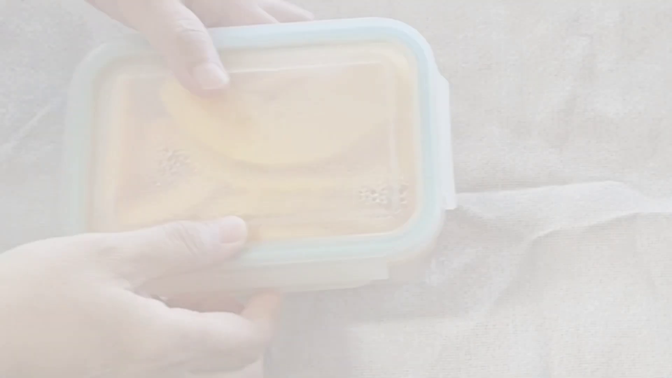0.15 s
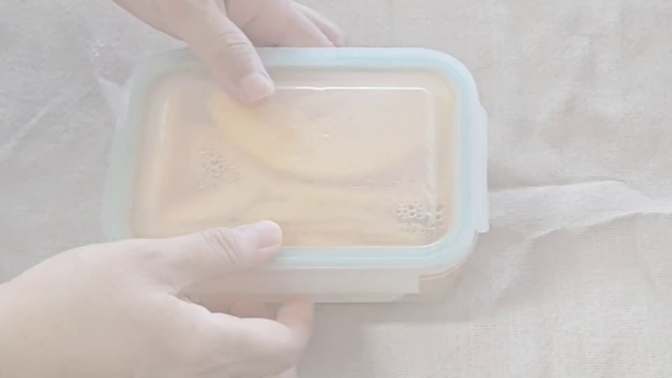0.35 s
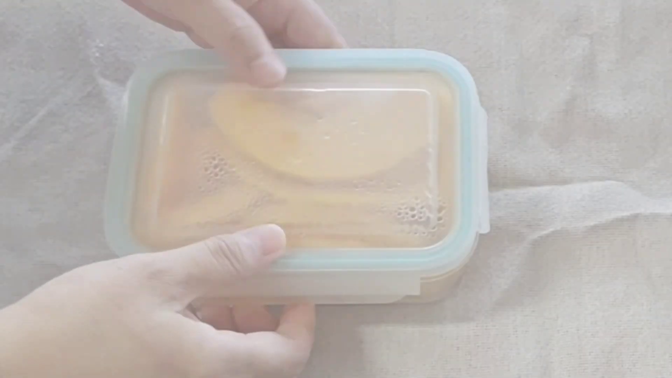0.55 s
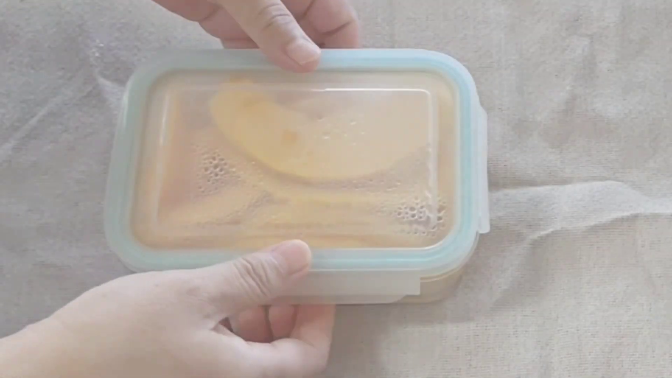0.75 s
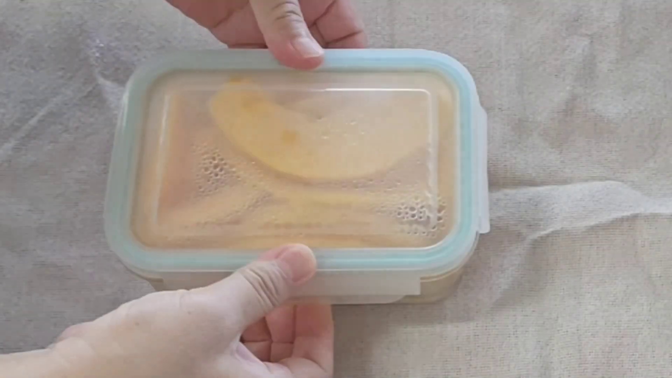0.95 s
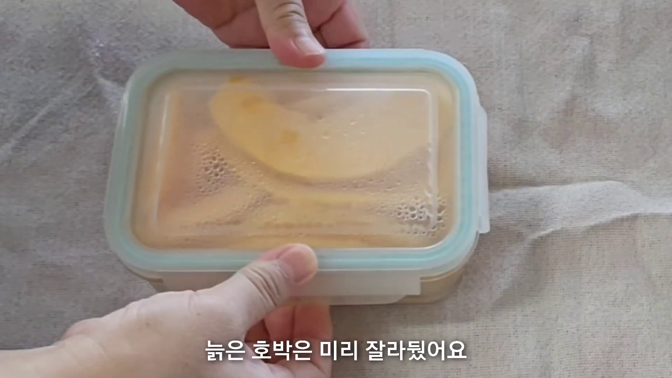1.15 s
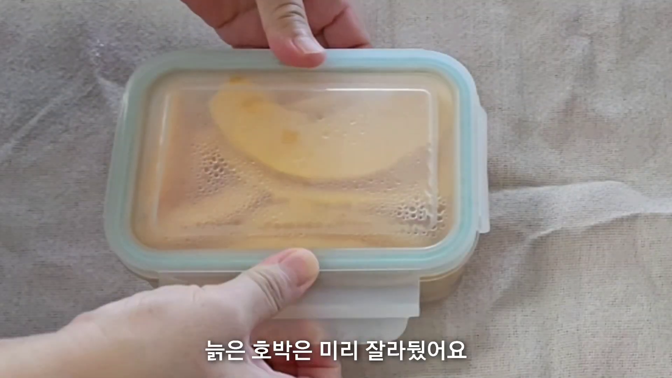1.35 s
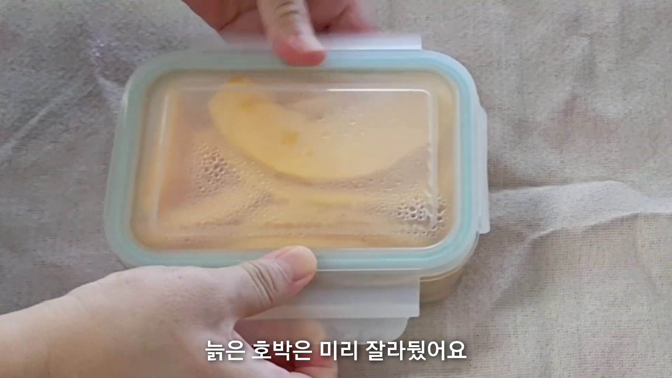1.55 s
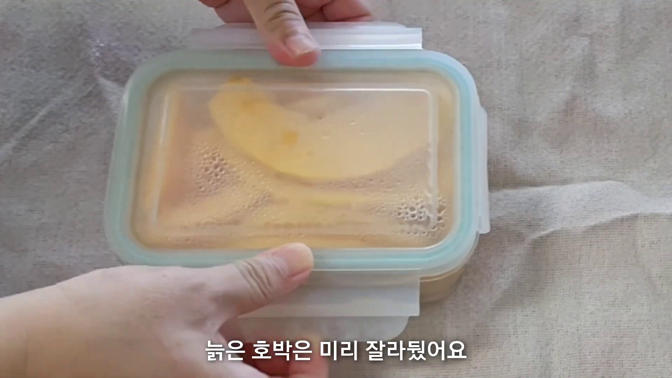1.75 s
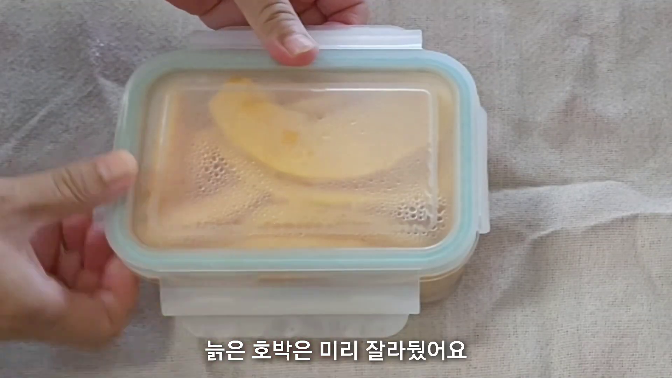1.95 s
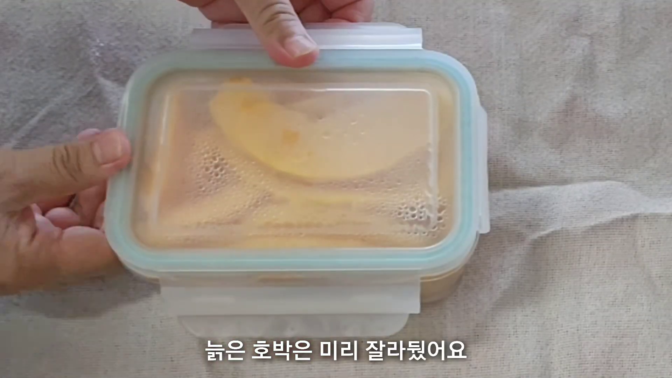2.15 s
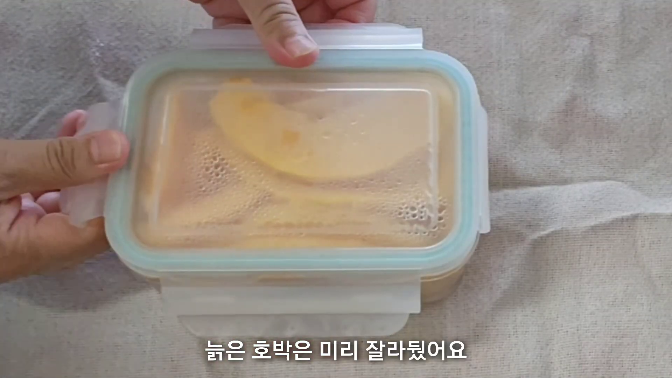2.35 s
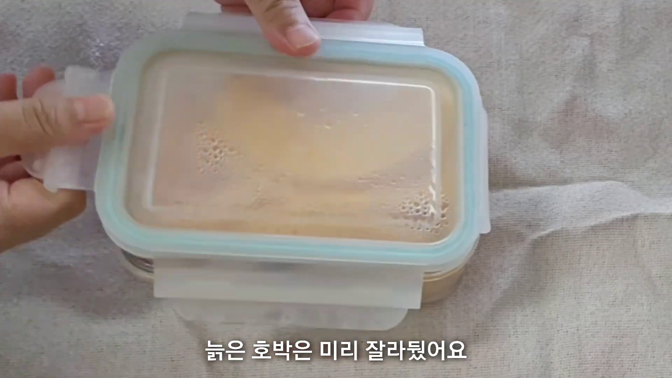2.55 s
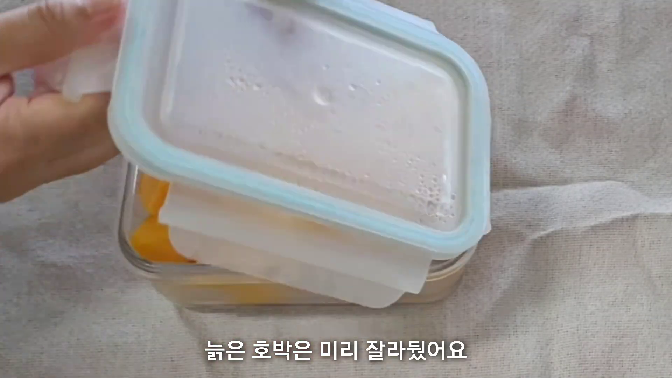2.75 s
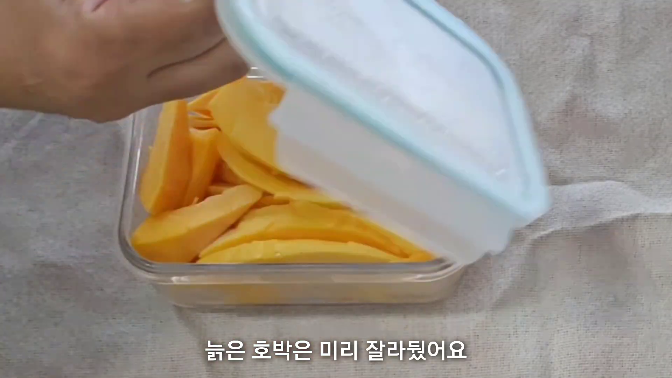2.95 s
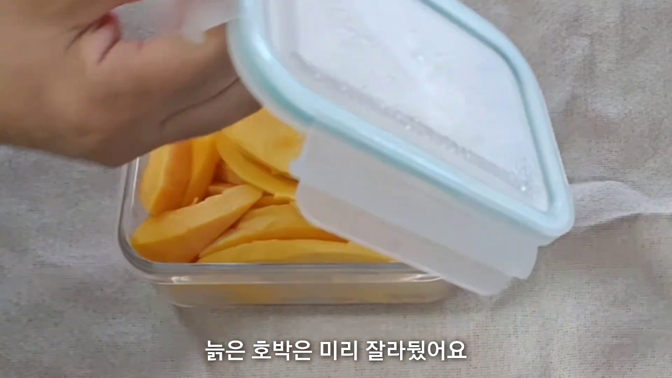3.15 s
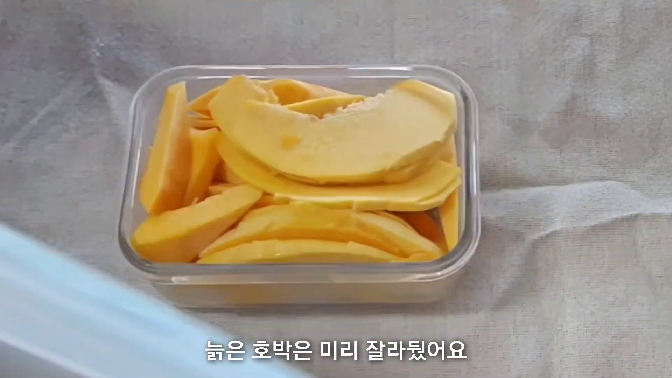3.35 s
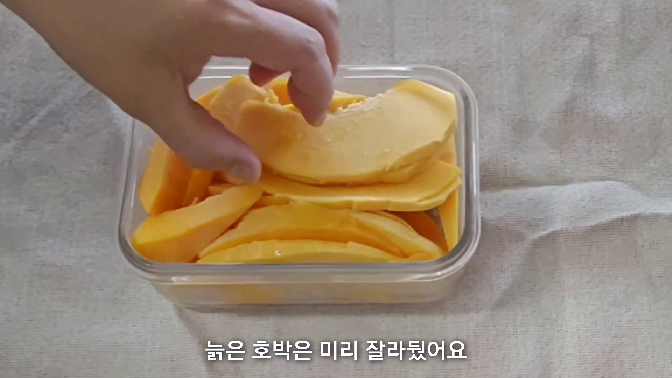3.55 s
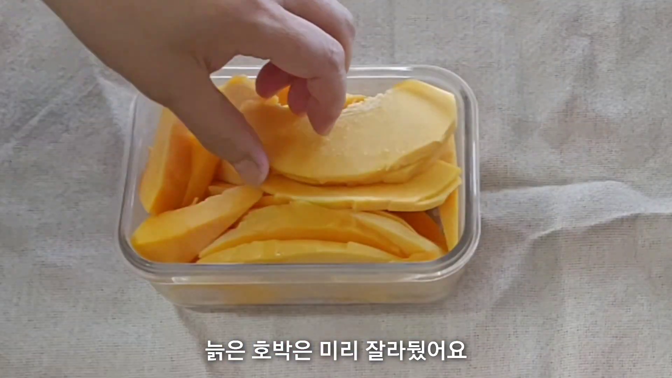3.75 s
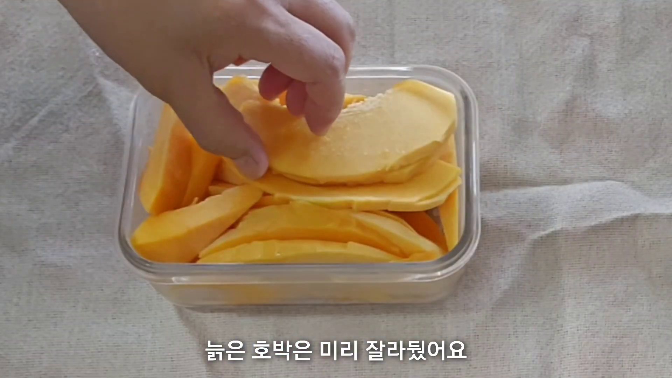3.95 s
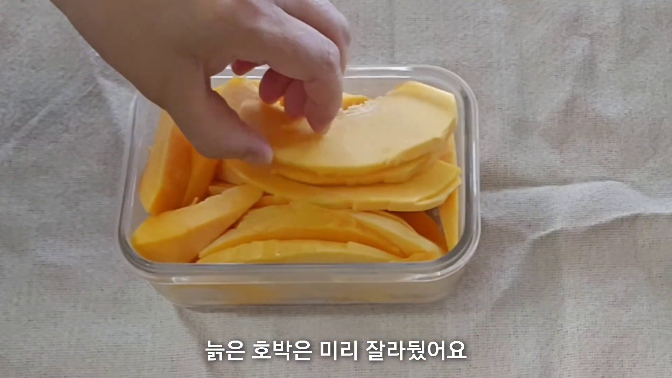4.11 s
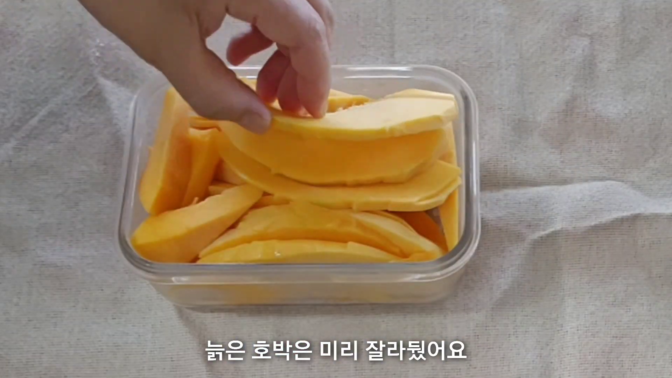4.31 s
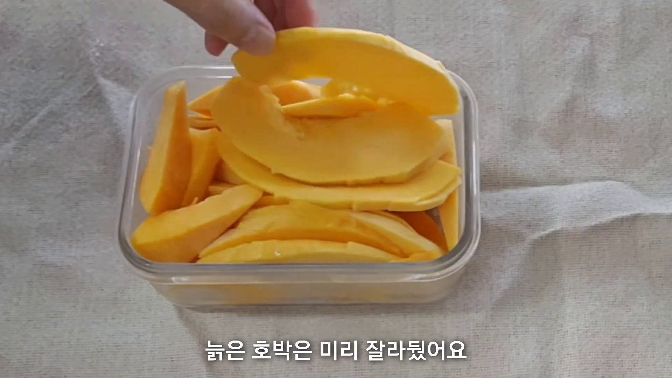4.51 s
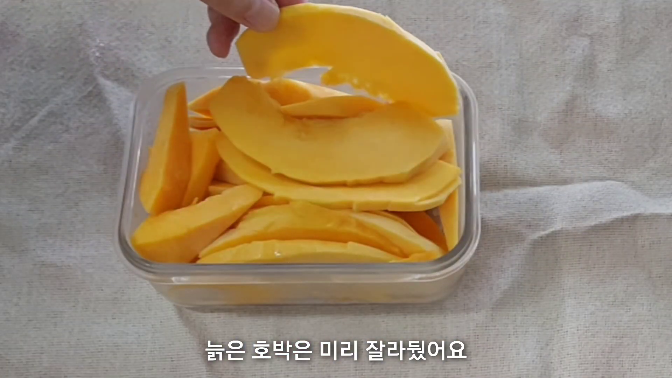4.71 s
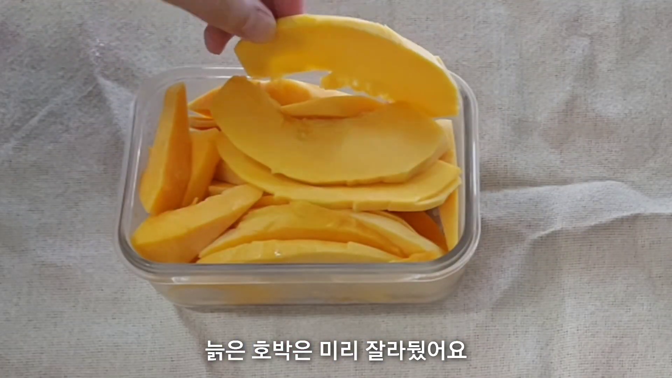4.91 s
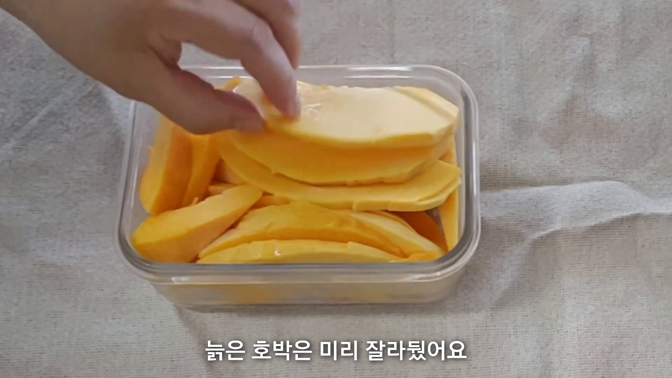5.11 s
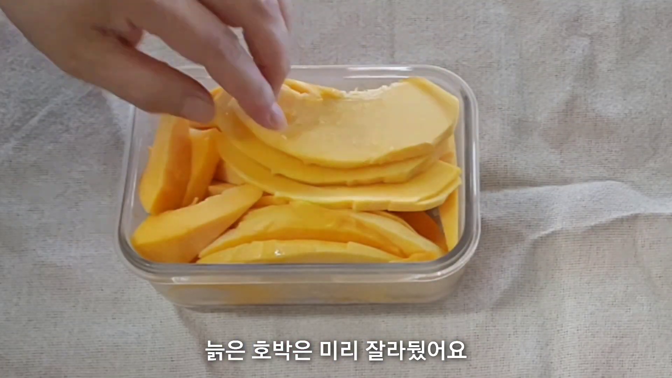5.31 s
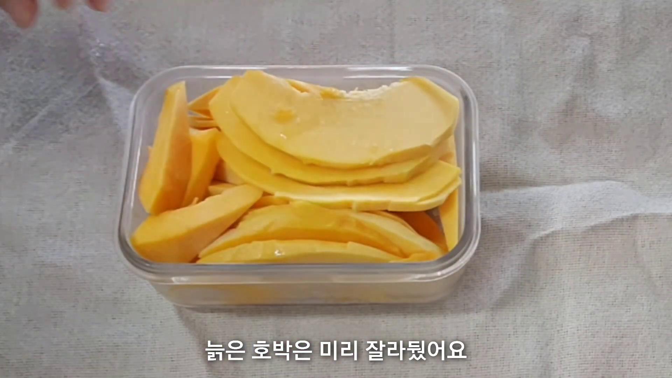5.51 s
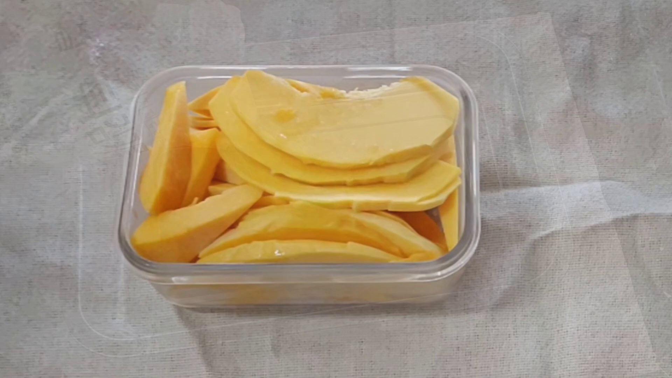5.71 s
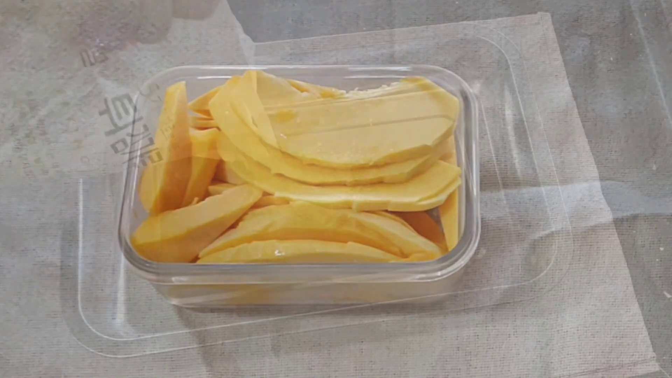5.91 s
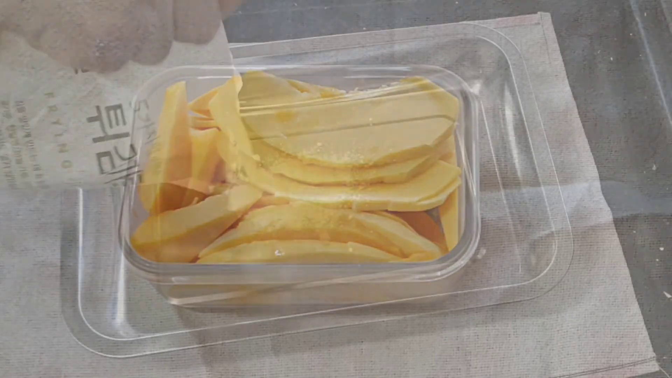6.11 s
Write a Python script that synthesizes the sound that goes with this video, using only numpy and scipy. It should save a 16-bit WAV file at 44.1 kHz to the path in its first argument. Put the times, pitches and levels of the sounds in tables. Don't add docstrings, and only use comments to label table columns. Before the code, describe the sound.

Over a faint low kitchen hum, skin scuffs lightly, then a heavy glass box thumps dully onto cloth. Three plastic latches snap open, the first by far the loudest. The lid knocks the rim and clacks down brighter to the side. After quiet moist finger touches on pumpkin slices, a plastic bag crackles. Close stereo microphone, lively room with short dense echoes.

```python
import sys
import numpy as np
from scipy import signal
from scipy.fft import rfft, irfft
from scipy.io import wavfile

SR = 44100
rng = np.random.default_rng(int(sys.argv[2]) if len(sys.argv) > 2 else 0)


def wav_record(signal):
    frames = np.transpose(np.atleast_2d(signal))
    bounded = np.clip(frames, -1, 1)
    quanta = np.round(bounded * 32767).astype(np.int16)
    wavfile.write(sys.argv[1], SR, quanta)


def rack_gain(trim_db):
    fader = np.asarray(trim_db, float)
    return 10 ** (fader / 20)


N = 272097
BANDS = 14 * 2 ** np.arange(0, 10.5, .4)
BAG_SHOT_S = 5.688


def rms_one(x):
    return x / np.sqrt(np.mean(x ** 2) + 1e-20)


def at_hz(points, hz):
    points_hz, values = np.array(points).T
    return np.interp(np.log(hz), np.log(points_hz), values)


def drift(rate, size=N):
    knots = rng.standard_normal(400)
    return np.interp(np.arange(size) / SR * rate, np.arange(400), knots)


def resonate(x, peaks, blur):
    rings = []
    for k, (hz, width, level_db) in enumerate(peaks):
        radius = np.exp(-np.pi * max(width, 10) * blur / SR)
        zeros = [(1 - radius ** 2) / 2, 0, (radius ** 2 - 1) / 2]
        poles = [1, -2 * radius * np.cos(2 * np.pi * hz / SR), radius ** 2]
        rings.append((-1) ** k * rack_gain(level_db) * signal.lfilter(zeros, poles, x))
    return np.array(rings)


def contacts(rows, peaks, rattle_s, room_db, rattle_db, creep_db, pan_db, apart):
    out = np.zeros((3, N + SR))
    lead = SR // 40
    t = (np.arange(SR // 4) - lead) / SR
    pan = rack_gain(np.array([[pan_db / 2], [-pan_db / 2]]))
    treble = signal.butter(1, 1500, "high", fs=SR, output="sos")
    for start_s, peak_db, top_hz, bottom_hz in rows:
        force_db = np.where(t < 0, creep_db + 60 * t / 0.038, rattle_db - 60 * t / rattle_s)
        slips = rng.standard_normal((3, len(t))) * rng.exponential(1, len(t))
        push = slips * rack_gain(force_db) * [[1], [1], [0]]
        push[:, lead] -= 1
        push = signal.sosfilt(signal.butter(2, min(top_hz, 18000), fs=SR, output="sos"), push)
        push = signal.sosfilt(signal.butter(2, bottom_hz, "high", fs=SR, output="sos"), push)

        mid, other = resonate(push[:2], peaks, blur=0.94).sum(axis=0)
        side = apart * signal.sosfilt(treble, np.roll(other, 3))

        room_rings = resonate(push[2], peaks, blur=2.0)
        power = np.sum(np.abs(rfft(room_rings)) ** 2, axis=0)
        spread = np.roll(irfft(np.sqrt(power), len(t)), lead + SR // 300)
        spread = spread * np.sqrt(np.sum(mid ** 2) / np.sum(spread ** 2)) * rack_gain(room_db)

        gain = rack_gain(peak_db) / np.abs(mid).max()
        first = round(start_s * SR) - lead
        out[:2, first:first + len(t)] += gain * (mid + side * [[1], [-1]]) * pan
        out[2, first:first + len(t)] += gain * spread
    return out[:, :N]


def diffuse(size, gain, edges=BANDS):
    # frequency in Hz, likeness from 0 to 1.
    likeness = [(60, 0.98), (130, 0.83), (290, 1), (640, .45), (1400, 0.), (16000, 0.055)]
    out = 0
    white = rng.standard_normal((2, 2, size))
    for k, (low, high) in enumerate(zip(edges, edges[1:])):
        band = signal.butter(2, [low, high], "band", fs=SR, output="sos")
        mid, side = signal.sosfilt(band, white[k % 2])
        hz = np.sqrt(low * high)
        alike = np.clip(at_hz(likeness, hz), -1, 1)
        out = out + gain(hz) * (np.sqrt(1 + alike) * mid + np.sqrt(1 - alike) * side * [[1], [-1]])
    return out


def latches():
    # start in seconds, peak level in dB, top in Hz, bottom in Hz.
    front_hits = [
        (1.5207, -2, 6000, 58.47),
        (1.5275, -21, 3000, 608),
    ]
    # start in seconds, peak level in dB, top in Hz, bottom in Hz.
    back_hits = [
        (1.7578, -13.5, 12200, 300),
        (1.760, -26.5, 5000, 100),
        (1.7645, -32.5, 7000, 40),
        (1.767, -25.5, 300, 30),
        (1.786, -42.5, 200, 30),
        (1.9675, -47.5, 9000, 500),
        (2.14, -65, 8120, 2000),
    ]
    # start in seconds, peak level in dB, top in Hz, bottom in Hz.
    side_hits = [
        (2.416, -33, 507, 60),
        (2.422, -17.5, 10190, 61),
        (2.4322, -24.5, 400, 60),
        (2.442, -35.5, 300, 60),
    ]
    # frequency in Hz, width in Hz, level in dB.
    front_ring = [(106, 73, -8.5), (330, 170, -9), (900, 100, -16.5), (1086, 150, -4.5), (1414, 200, 1.5),
                  (1899, 220, -3), (2200, 190, -4), (2680, 330, -14.5), (3120, 140, -9), (4123, 400, -18),
                  (5200, 550, -24), (6260, 600, -22), (7720, 800, -21.5), (12700, 1300, -23)]
    # frequency in Hz, width in Hz, level in dB.
    back_ring = [(54, 56, 1.5), (200, 130, 2), (350, 90, -0.5), (520, 35, -2), (770, 130, -9.5),
                 (1000, 130, 0), (1476, 160, 0.5), (1990, 260, -8), (3030, 130, -5), (4748, 500, -10),
                 (5370, 300, -9), (7000, 1100, -22.5), (11600, 1800, -26.5), (14510, 1100, -30)]
    # frequency in Hz, width in Hz, level in dB.
    side_ring = [(103, 42.9, 8.5), (244, 46, -4), (328, 28, 3.5), (538, 58, 2), (760, 97, -13.5),
                 (1017, 136, -0.5), (1330, 180, -2), (2060, 262, -12.5), (3115, 150, -12.5),
                 (3500, 300, -14.5), (5390, 835, -25.5), (7400, 600, -27), (10660, 1200, -23.5),
                 (14210, 1700, -27)]
    front = contacts(front_hits, front_ring, rattle_s=0.055, room_db=-14, rattle_db=-31, creep_db=-48.5,
                     pan_db=1.5, apart=0.54)
    back = contacts(back_hits, back_ring, rattle_s=0.037, room_db=-9, rattle_db=-21, creep_db=-41.5,
                    pan_db=2.5, apart=0.36)
    side = contacts(side_hits, side_ring, rattle_s=0.034, room_db=-12.5, rattle_db=-22.5, creep_db=-45.5,
                    pan_db=1.5, apart=0.82)
    return front + back + side


def glass_box():
    # start in seconds, peak level in dB, top in Hz, bottom in Hz.
    landing_hits = [
        (.4975, -28.5, 220, 60.2),
        (.5325, -39, 900, 200),
        (.5345, -15, 3500, 150),
        (.5395, -24.5, 900, 61),
        (.546, -23.5, 700, 59.84),
    ]
    # start in seconds, peak level in dB, top in Hz, bottom in Hz.
    slide_slips = [
        (.546, -59, 7000, 2500),
        (.565, -58, 7000, 2500),
        (.62, -59, 7000, 2500),
        (1.775, -37.5, 7000, 2500),
        (1.85, -57, 7000, 2440),
    ]
    # start in seconds, peak level in dB, top in Hz, bottom in Hz.
    counter_thuds = [
        (.536, -36.5, 90, 20),
        (1.523, -36, 122.4, 19),
        (1.762, -32, 120.4, 20.5),
        (2.425, -33, 120, 20),
        (5.375, -49, 150, 54),
    ]
    # frequency in Hz, width in Hz, level in dB.
    glass_ring = [(100.5, 11, 10), (268, 60, 7), (347, 47, 2.5), (550, 96, 6), (774, 56, 6.5),
                  (1060, 84, 3.5), (1358, 71, 1), (2200, 400, -40), (4000, 1100, -41), (12000, 4500, -29)]
    # frequency in Hz, width in Hz, level in dB.
    squeak_ring = [(3120, 61, 6), (3434, 40, 5.5), (3990, 310, -2.5), (4640, 80, -5.5), (5040, 83, -2.5),
                   (5380, 82, 6), (6170, 50, -1.5)]
    # frequency in Hz, width in Hz, level in dB.
    counter_ring = [(35.3, 16, -2.5), (62.72, 30, 0.5), (100, 40, 1.5)]
    landing = contacts(landing_hits, glass_ring, rattle_s=0.056, room_db=-10, rattle_db=-31.5, creep_db=-45.5,
                       pan_db=1.5, apart=0.4)
    squeak = contacts(slide_slips, squeak_ring, rattle_s=.4, room_db=-4.5, rattle_db=-4.5, creep_db=-0.5,
                      pan_db=3.5, apart=.9)
    boom = contacts(counter_thuds, counter_ring, rattle_s=.03, room_db=-14.5, rattle_db=-33.5, creep_db=-48.5,
                    pan_db=1.66, apart=.1)
    return landing + squeak + boom


def lid():
    # start in seconds, peak level in dB, top in Hz, bottom in Hz.
    lift_hits = [
        (2.610, -49, 1500, 705),
        (2.6203, -32.5, 7500, 784),
        (2.632, -36, 7940, 200),
        (2.6765, -47, 3000, 200),
        (2.684, -47.5, 503, 150),
        (2.691, -46.5, 8650, 805),
        (2.703, -53, 1000, 200),
        (2.845, -40, 604, 426),
        (2.8455, -46, 2530, 1190),
    ]
    # start in seconds, peak level in dB, top in Hz, bottom in Hz.
    lay_hits = [
        (3.1215, -42, 1500, 706),
        (3.128, -32, 5000, 1000),
        (3.1325, -24.5, 13960, 400),
        (3.14, -35, 5000, 1200),
        (3.151, -44, 6000, 1500),
        (3.352, -58, 11900, 1500),
    ]
    # frequency in Hz, width in Hz, level in dB.
    loose_ring = [(337, 48, 8), (507, 55, 9), (1000, 180, -4.5), (1500, 260, -11), (2082, 80, -7),
                  (3304, 550, -14.5), (5000, 840, -20), (7260, 670, -27.5), (11840, 1800, -30)]
    # frequency in Hz, width in Hz, level in dB.
    laid_ring = [(512.5, 220, -17.5), (1136, 200, -4), (1542, 99, 1.5), (2330, 370, -4.5), (3000, 124, 0.5),
                 (3380, 210, -4), (4390, 278, -0.5), (5650, 180, -4.5), (6440, 320, -11.5),
                 (7370, 250, -6.5), (10740, 1500, -13.5), (13510, 2500, -18)]
    lifted = contacts(lift_hits, loose_ring, rattle_s=0.086, room_db=-11, rattle_db=-27, creep_db=-41,
                      pan_db=2.0, apart=0.63)
    laid = contacts(lay_hits, laid_ring, rattle_s=0.035, room_db=-8.5, rattle_db=-9.5, creep_db=-30.0,
                    pan_db=4.0, apart=0.62)
    return lifted + laid


def bag_crackle():
    # start in seconds, peak level in dB, top in Hz, bottom in Hz.
    film_pops = [(5.706, -47, 2520, 400), (5.724, -37, 1500, 606), (5.732, -28.5, 2560, 300),
                 (5.740, -29, 2540, 504), (5.799, -38, 800, 400), (5.819, -40, 1500, 496),
                 (5.867, -33.5, 2200, 580), (5.881, -40, 3500, 606), (5.904, -35.5, 2300, 590),
                 (5.912, -35, 2000, 500), (5.9595, -38.5, 1790, 590), (6.018, -41, 3500, 800),
                 (6.051, -50, 2470, 500), (6.0825, -32, 1900, 930), (6.098, -31.5, 2000, 860),
                 (6.107, -36, 1500, 500), (6.166, -25.5, 2430, 490)]
    # start in seconds, peak level in dB, top in Hz, bottom in Hz.
    crease_ticks = [
        (5.7755, -33, 7000, 800),
        (5.976, -35, 4000, 800),
        (5.983, -30, 11600, 1880),
        (6.0945, -36, 8440, 900),
        (6.1615, -26.5, 3000, 580),
    ]
    # frequency in Hz, width in Hz, level in dB.
    film_ring = [(102.5, 34, 0.5), (300, 710, -6), (884, 680, -3), (1170, 186, -1), (1500, 150, -5),
                 (2000, 250, -8), (3430, 760, -15.5), (5300, 790, -21), (7570, 1200, -25),
                 (11900, 500, -13)]
    # frequency in Hz, width in Hz, level in dB.
    crease_ring = [(1060, 570, 11), (2000, 370, -1.5), (3000, 490, -7.5), (5260, 670, 1), (5550, 400, 1.5),
                   (7700, 1200, -13), (11600, 980, -13)]
    pops = contacts(film_pops, film_ring, rattle_s=0.028, room_db=-12.5, rattle_db=-24, creep_db=-32,
                    pan_db=-0.5, apart=0.62)
    ticks = contacts(crease_ticks, crease_ring, rattle_s=0.018, room_db=-12.5, rattle_db=-11.5, creep_db=-24.5,
                     pan_db=2.0, apart=0.7)
    return pops + ticks


def bag_rustle():
    # frequency in Hz, density in dB per Hz.
    rustle_colour = [(60, 0), (120, -6), (250, 0.5), (500, -7), (1100, -7.5), (2000, -18), (4000, -21.5),
                     (7000, -29.5), (9500, -33), (11500, -29.5), (16000, -36.5)]
    level_db, swell_db_per_s = -54.5, 4.5
    start = round(BAG_SHOT_S * SR)
    size = N - start
    clumps = drift(40, size)

    def patchy(hz):
        return rack_gain(at_hz(rustle_colour, hz) + 2.0 * clumps + 2.2 * drift(27, size))

    swell = rack_gain(level_db + swell_db_per_s * np.arange(size) / SR)
    film = swell * rms_one(diffuse(size, patchy))
    return np.pad(film, ((0, 0), (start, 0)))


def fingers():
    # start in seconds, peak level in dB, top in Hz, bottom in Hz.
    touches = [
        (.73, -60, 9350, 3000),
        (.8546, -44.5, 11600, 1500),
        (.9124, -56.5, 6000, 300),
        (1.043, -61, 8800, 2000),
        (4.307, -44.5, 12900, 790),
        (5.3755, -52.5, 1500, 890),
    ]
    # start in seconds, peak level in dB, top in Hz, bottom in Hz.
    scuffs = [
        (.145, -62, 8200, 2600),
        (.251, -59.5, 8000, 1908),
        (.33, -64, 5970, 2537),
        (3.922, -58, 5000, 1934),
        (3.99, -68, 5000, 2514),
    ]
    # frequency in Hz, width in Hz, level in dB.
    skin_ring = [(150, 53, -7.5), (400, 140, -2.5), (1300, 890, -4.5), (2120, 200, 0), (4153, 980, -3.5),
                 (7500, 860, -12), (11780, 680, -3.5)]
    taps = contacts(touches, skin_ring, rattle_s=.035, room_db=-7.5, rattle_db=-7.0, creep_db=-18,
                    pan_db=4.5, apart=0.5)
    drags = contacts(scuffs, skin_ring, rattle_s=0.35, room_db=1, rattle_db=-12.0, creep_db=-20,
                     pan_db=4.0, apart=0.76)
    return taps + drags


def kitchen_echoes(send):
    # frequency in Hz, time to fall 60 dB in seconds.
    kitchen_t60 = [(60, 1), (250, 1), (1000, 0.74), (3000, 0.74), (6000, 0.82), (9000, 0.2), (15000, .25)]
    early_t60_s, early_db, first_echo_s = 0.13, 10, 0.0012
    bright_db_per_octave, bright_from_hz = 1.5, 5500
    t = np.arange(SR * 3 // 4) / SR

    def decay(hz):
        bright = rack_gain(bright_db_per_octave * max(np.log2(hz / bright_from_hz), 0))
        slow = rack_gain(-60 * t / at_hz(kitchen_t60, hz))
        quick = rack_gain(early_db - 60 * t / early_t60_s)
        return bright * (slow + quick)

    echoes = diffuse(len(t), decay) * np.clip(t / first_echo_s - 1, 0, 1)
    echoes = echoes / np.sqrt(np.sum(echoes ** 2) / 2)
    return signal.fftconvolve(send[None], echoes, axes=1)[:, :N]


def hum():
    # frequency in Hz, density in dB per Hz.
    hum_colour = [(14, -9.5), (25, -7.5), (40, 1.5), (60, -3.5), (86, -7), (115, -10), (150, -25.5),
                  (240, -6.5), (300, -25.5), (390, -24), (520, -18), (700, -29.5), (1300, -32.5),
                  (3000, -58.5)]
    # frequency in Hz, density in dB per Hz.
    hiss_colour = [(800, -7.5), (1500, 2.5), (3000, -3.5), (4800, -4.5), (6000, -13), (7500, -13),
                   (9500, -24), (11500, -10.5), (13000, -16.5), (16000, -19.5)]
    t = np.arange(N) / SR
    bag_shot = np.maximum(t - BAG_SHOT_S, 0)
    sleeves_db = 5 * np.exp(-((t - 0.52) / .2) ** 2)
    hum_db = -58 - 0.56 * t + 10 * bag_shot
    hiss_db = -75 - 1.27 * t - 21 * bag_shot + sleeves_db
    murmur = diffuse(N, lambda hz: rack_gain(at_hz(hum_colour, hz) + 1.9 * drift(4.3)), BANDS[BANDS < 5000])
    hiss = diffuse(N, lambda hz: rack_gain(at_hz(hiss_colour, hz)), BANDS[BANDS > 600])
    gap = np.clip(np.abs(t - 3.473) / .005, 0, 1) ** 4
    lean = rack_gain(np.array([[.7], [-.7]]))
    return (rack_gain(hum_db) * rms_one(murmur) + rack_gain(hiss_db) * rms_one(hiss)) * gap * lean


def scene():
    near = glass_box() + latches() + lid() + fingers() + bag_crackle()
    return near[:2] + kitchen_echoes(near[2]) + bag_rustle() + hum()


def low_pass(x):
    return signal.sosfilt(signal.butter(12, 16050, fs=SR, output="sos"), x)


def record(dry):
    rounded = dry / (1 + np.abs(dry / .99) ** 12) ** (1 / 12)
    return low_pass(rounded)


dry = scene()
out = record(dry)
wav_record(out)
```